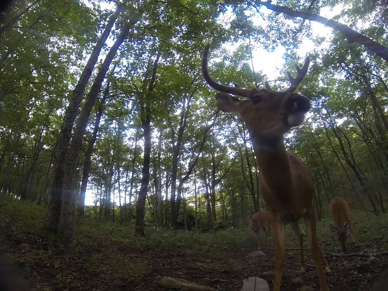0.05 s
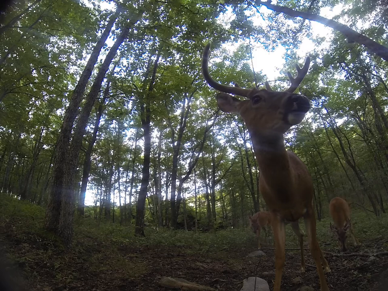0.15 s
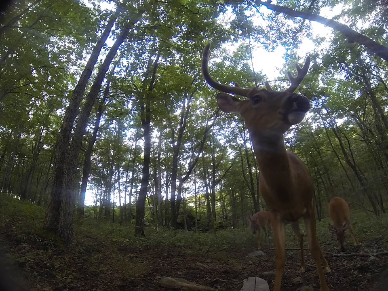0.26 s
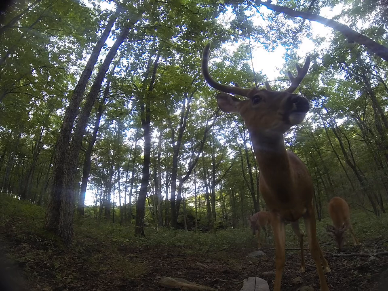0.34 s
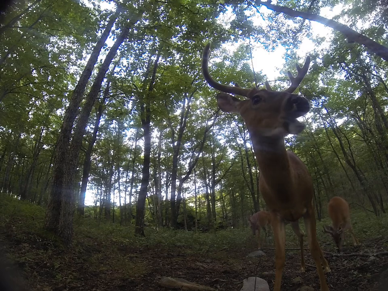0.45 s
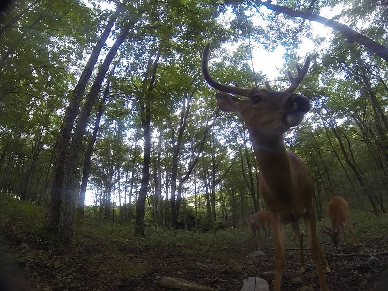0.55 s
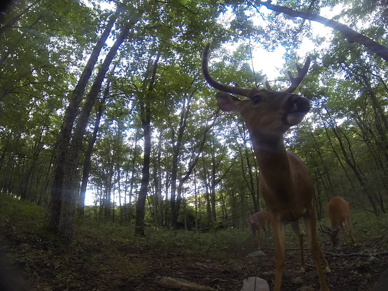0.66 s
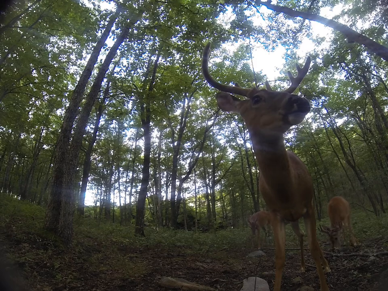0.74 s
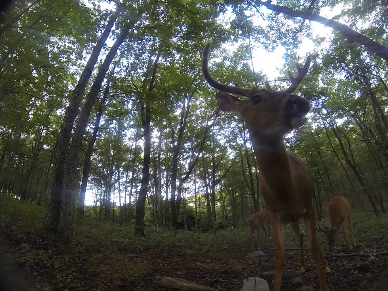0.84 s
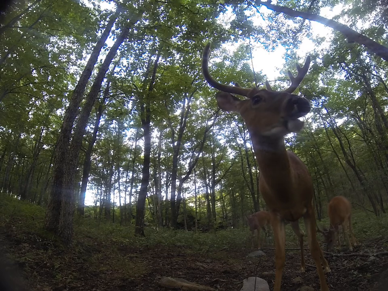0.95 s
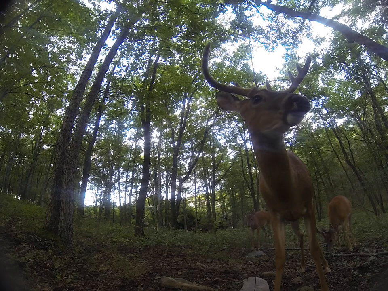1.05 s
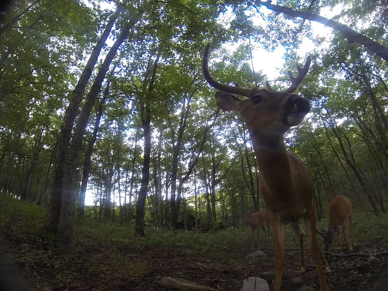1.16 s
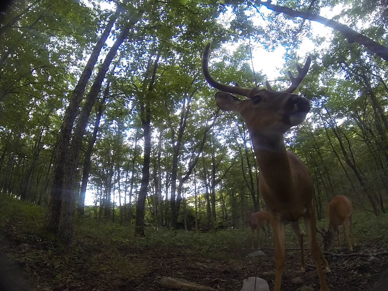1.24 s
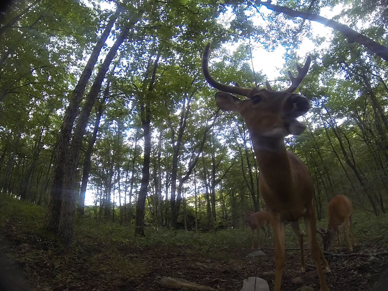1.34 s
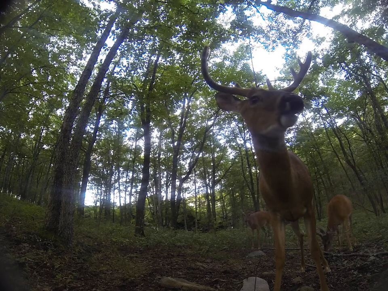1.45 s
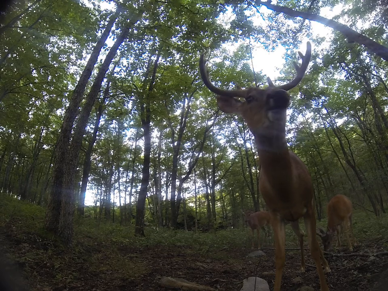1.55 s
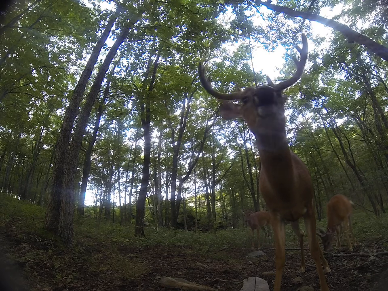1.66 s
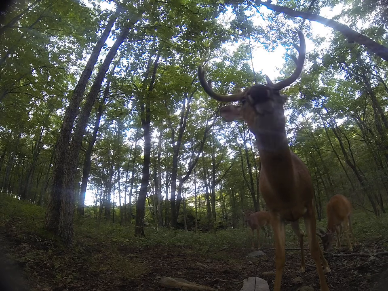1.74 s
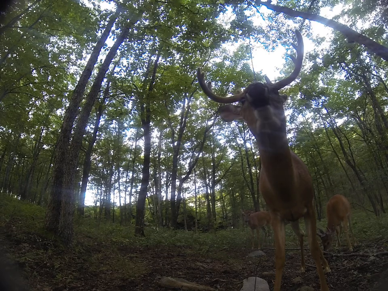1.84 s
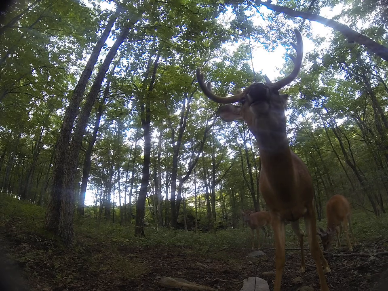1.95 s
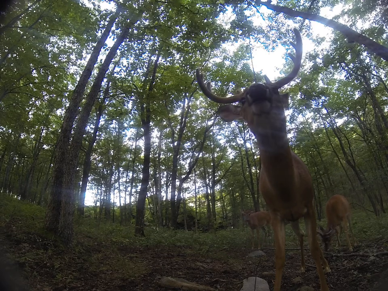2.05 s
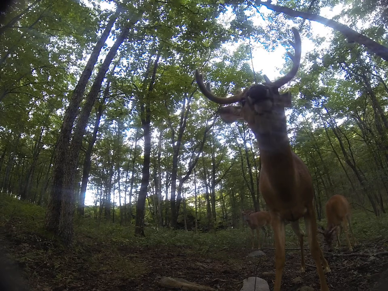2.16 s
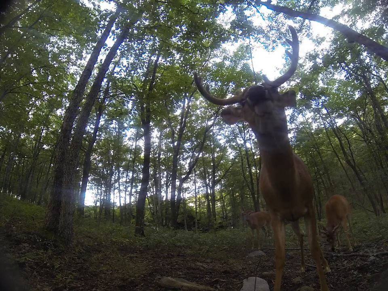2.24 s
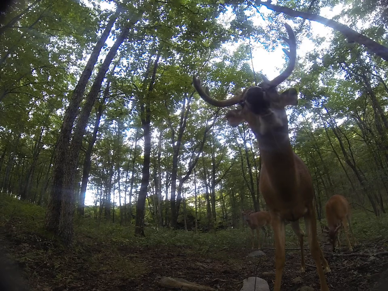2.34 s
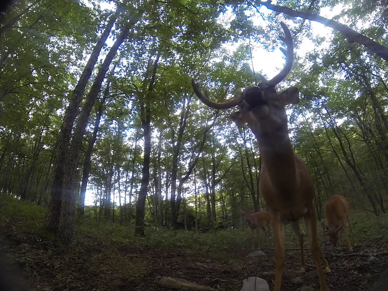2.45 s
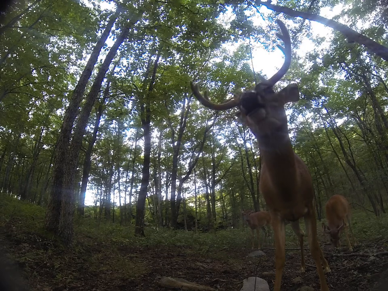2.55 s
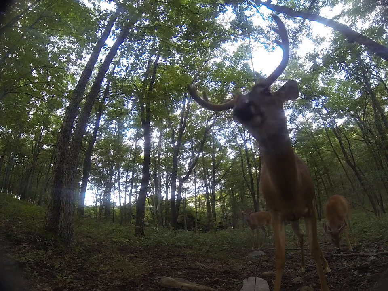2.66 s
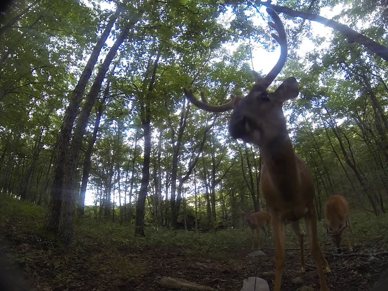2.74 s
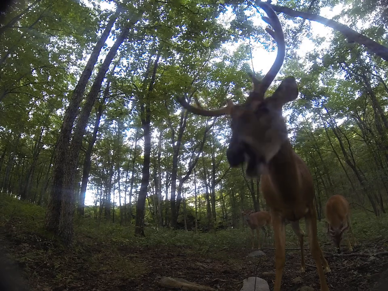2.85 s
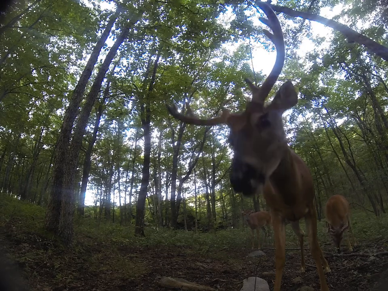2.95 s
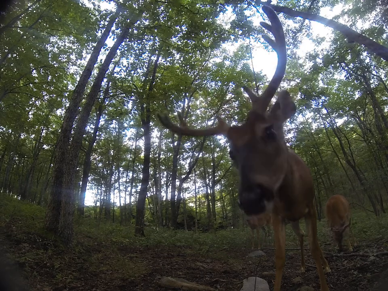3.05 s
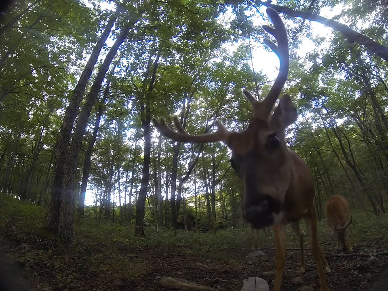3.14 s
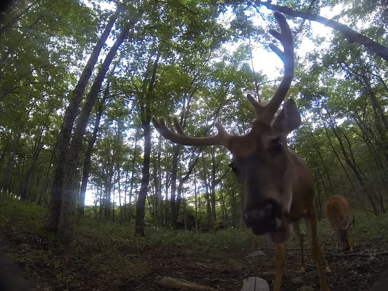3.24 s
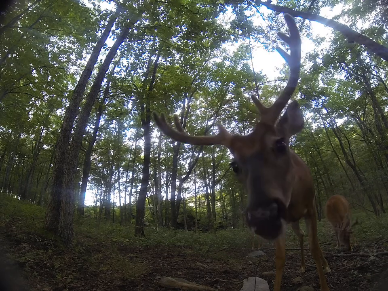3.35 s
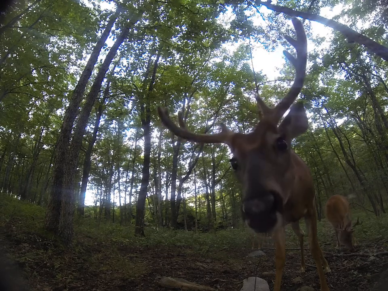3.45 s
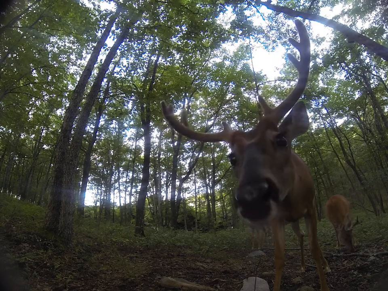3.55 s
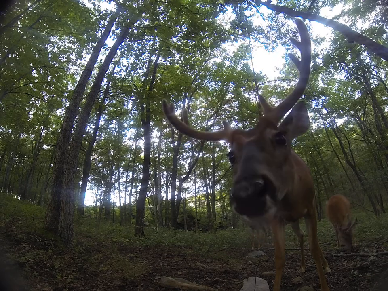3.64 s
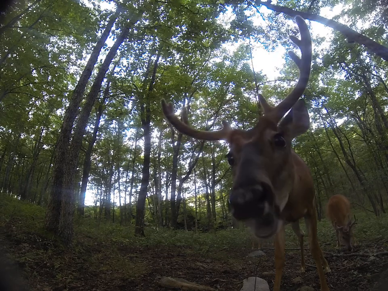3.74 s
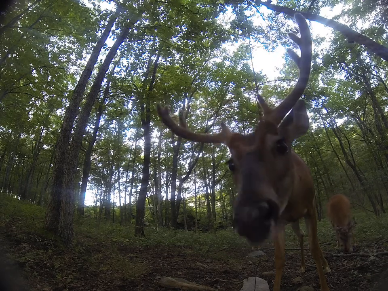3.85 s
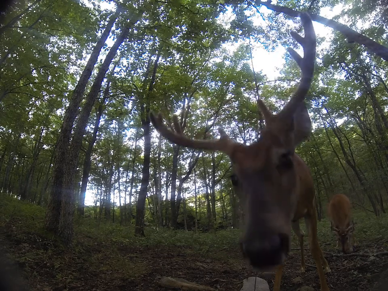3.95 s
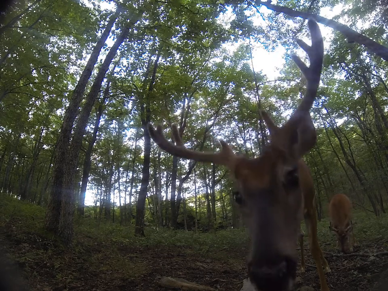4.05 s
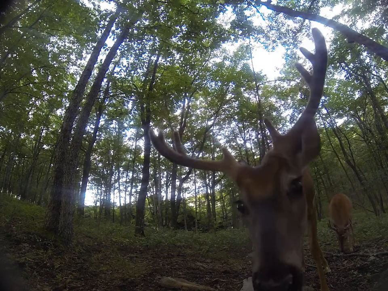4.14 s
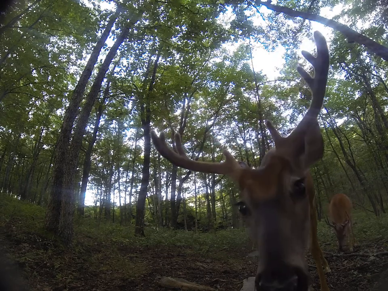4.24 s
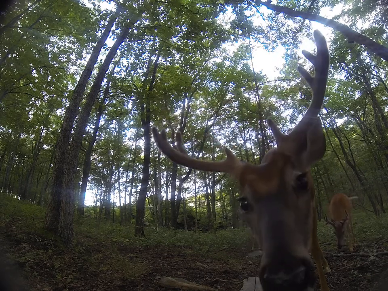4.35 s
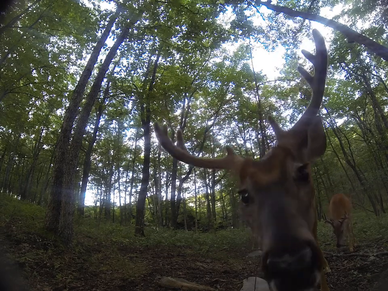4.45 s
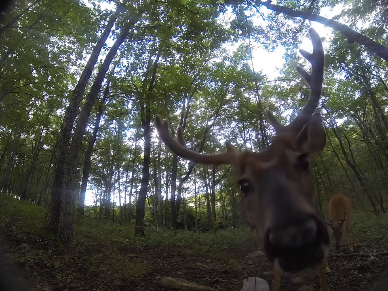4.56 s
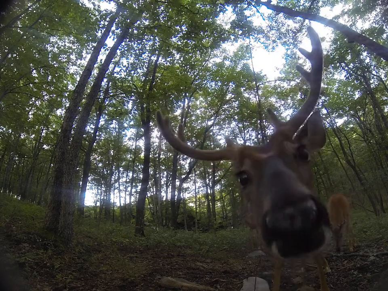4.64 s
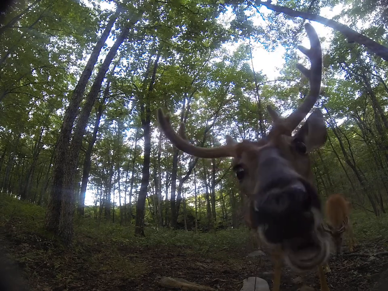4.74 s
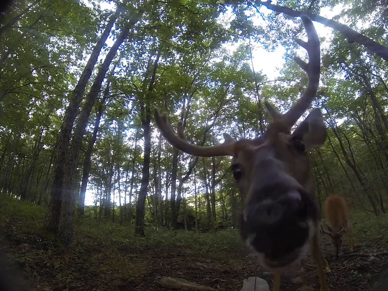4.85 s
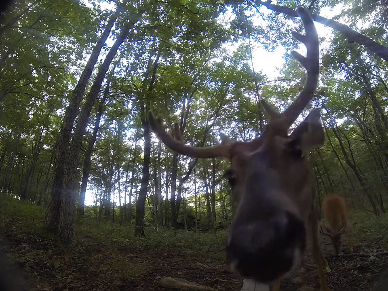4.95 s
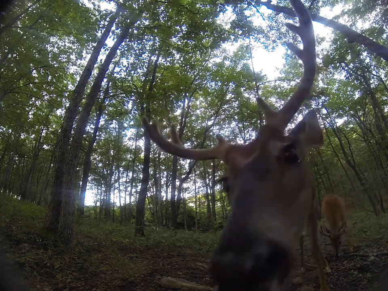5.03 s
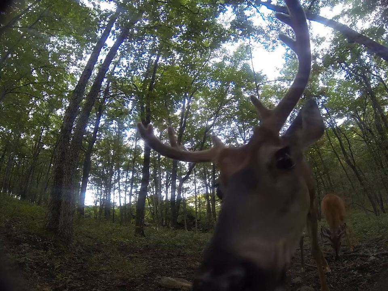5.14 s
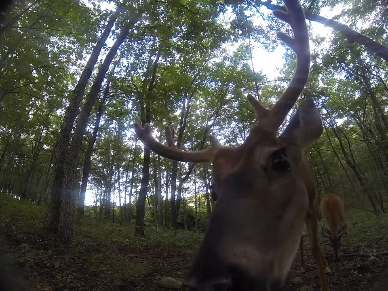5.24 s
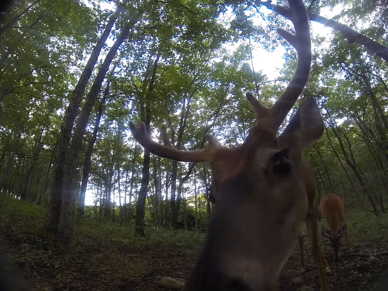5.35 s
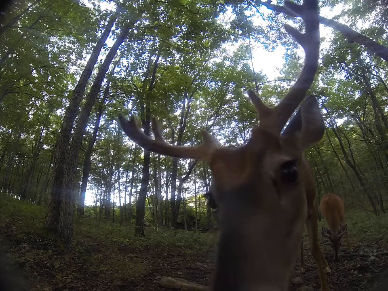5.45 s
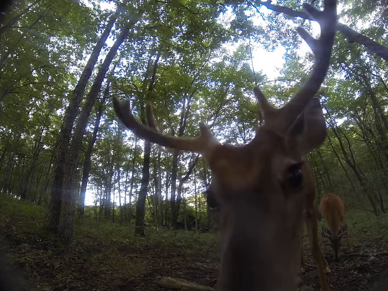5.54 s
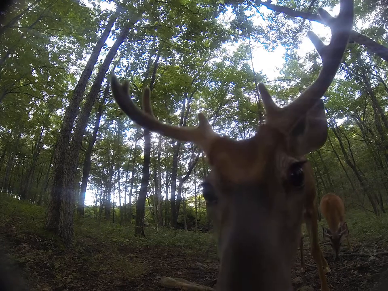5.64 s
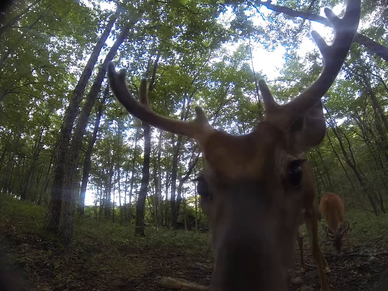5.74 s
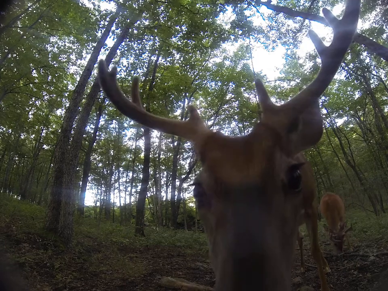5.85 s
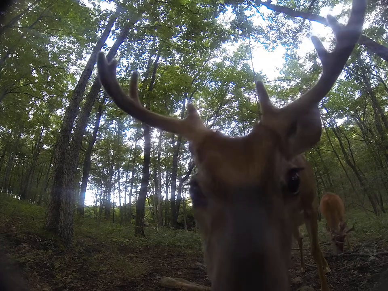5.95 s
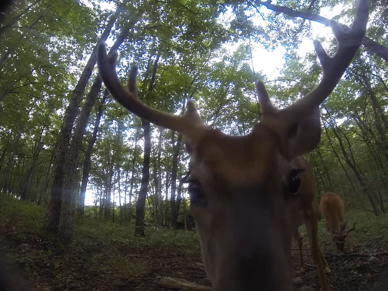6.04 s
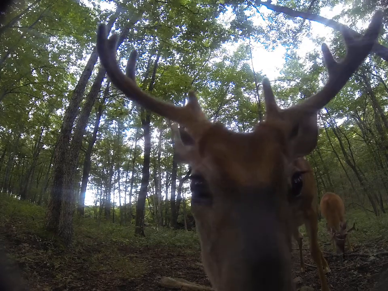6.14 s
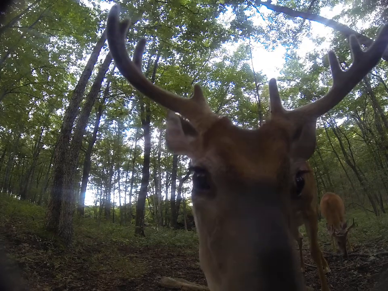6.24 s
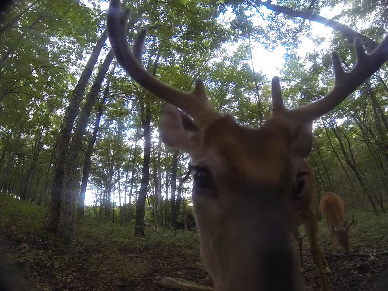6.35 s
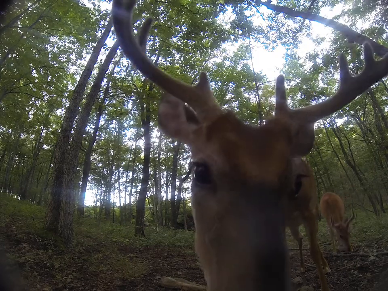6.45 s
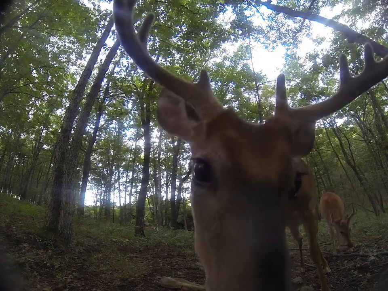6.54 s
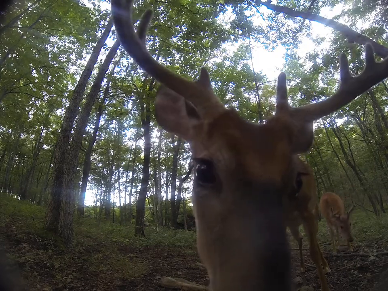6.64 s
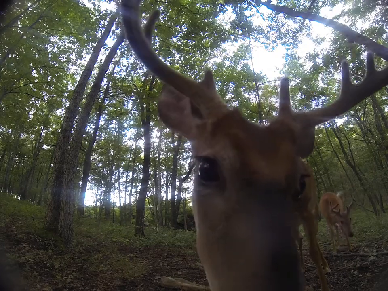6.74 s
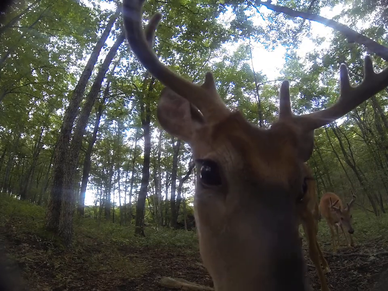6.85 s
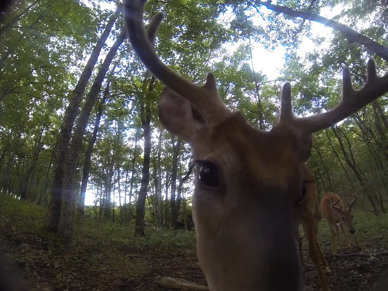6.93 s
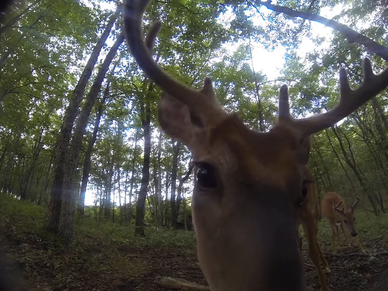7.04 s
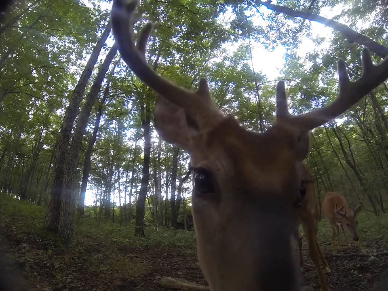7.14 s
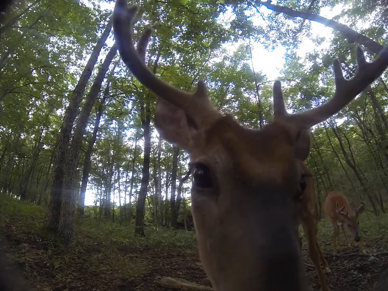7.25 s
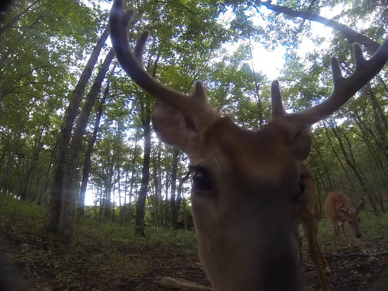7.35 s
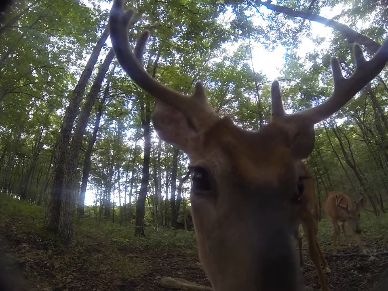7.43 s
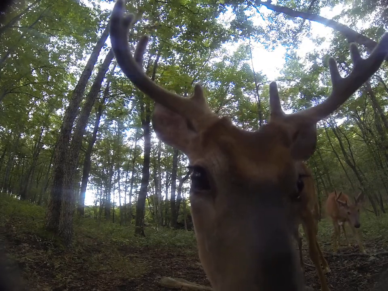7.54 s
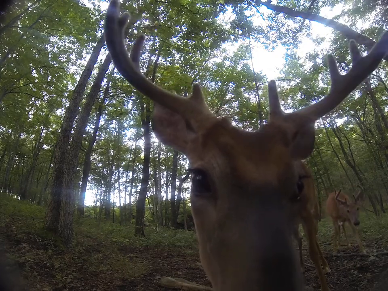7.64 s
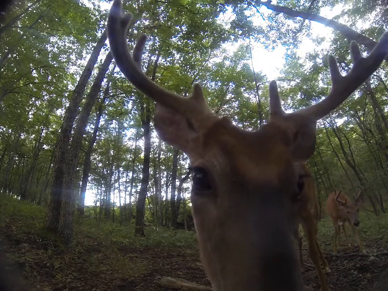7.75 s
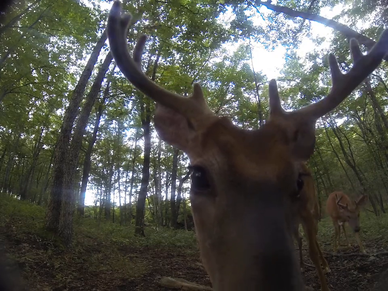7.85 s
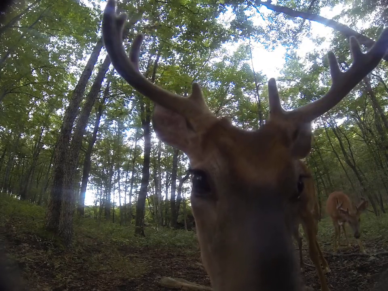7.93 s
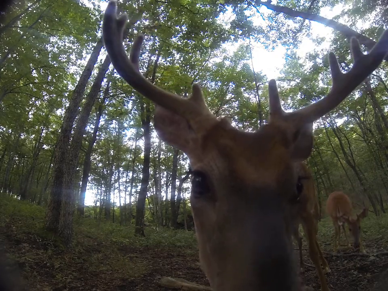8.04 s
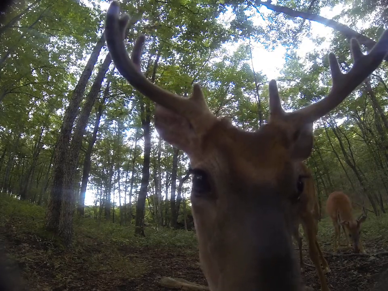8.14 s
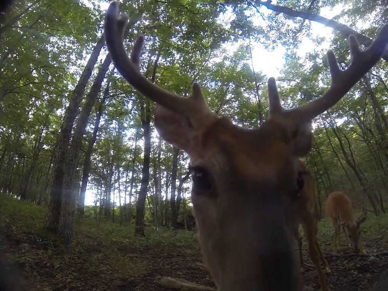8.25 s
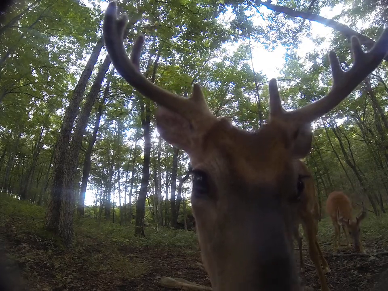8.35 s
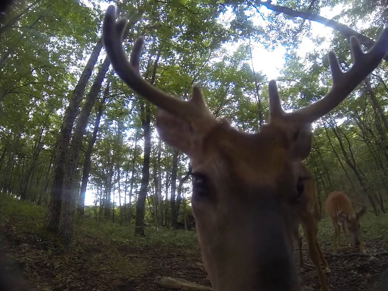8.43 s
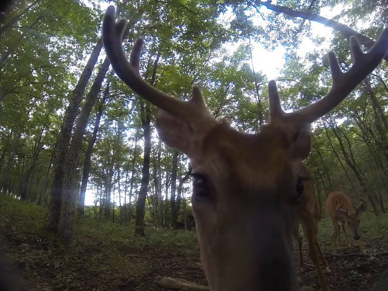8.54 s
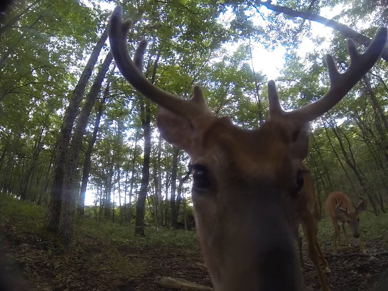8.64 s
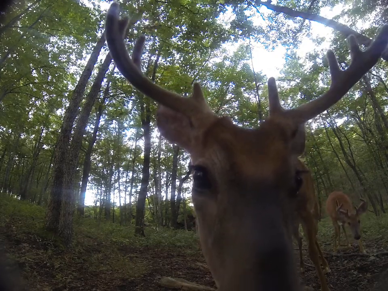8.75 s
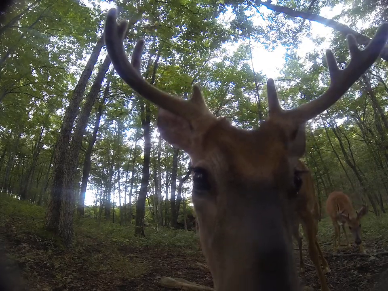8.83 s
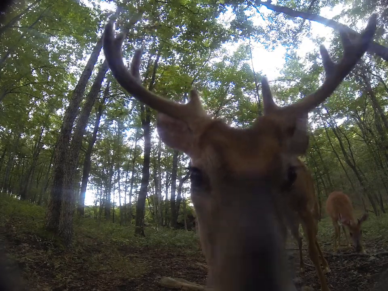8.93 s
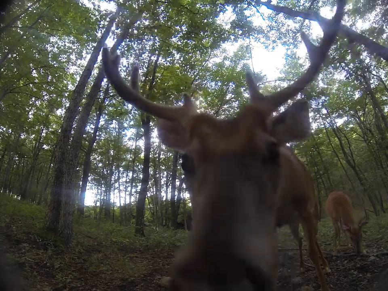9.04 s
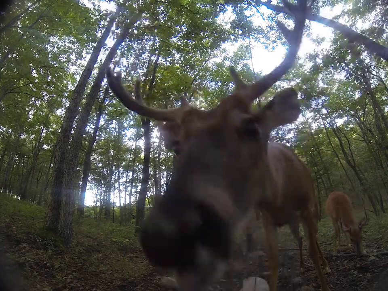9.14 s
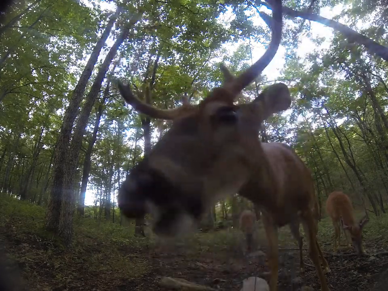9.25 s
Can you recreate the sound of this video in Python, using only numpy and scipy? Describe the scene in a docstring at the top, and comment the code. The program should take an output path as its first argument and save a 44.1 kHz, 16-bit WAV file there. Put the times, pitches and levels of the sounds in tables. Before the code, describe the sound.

Heard from a microphone sealed inside a plastic shell: first mostly quiet hiss and thin electronic whine, with sparse small clicks of a deer's teeth. After more than half the time, abrupt, boxy, rapid scraping and knocking fills everything as the tongue drags and catches on the shell. Soft deep bumps rock the camera, one especially heavy near the end, before near quiet.

```python
"""A deer's tongue sticks and slips on the sealed plastic shell of a small camera on the forest floor.
The shell's own tones ring at each slip, and a scraping drag runs between the slips.
Dull taps stir the hollow inside, while nudges and a steady push rock the camera on the ground.
Before that, faint chewing clicks come through the shell; the camera hisses and whines throughout."""
import sys
import numpy as np
from scipy import signal
from scipy.fft import rfft, irfft, next_fast_len
from scipy.io import wavfile
from scipy.ndimage import uniform_filter1d, map_coordinates

SR = 44100
rng = np.random.default_rng(int(sys.argv[2]) if len(sys.argv) > 2 else 0)


def master(y):
    """Save y as 16-bit WAV."""
    cut = np.clip(np.atleast_2d(y).T, -1, 1)
    pcm = np.round(cut * 32767)  # scale
    wavfile.write(sys.argv[1], SR, pcm.astype(np.int16))


def makeup_ratio(level_db):
    """Linear amplitude ratio for a level in decibels (20 dB per factor of ten)."""
    decades = np.asarray(level_db, float) / 20
    return 10 ** decades


N = 409688
t = np.arange(N) / SR


def unit(x):
    """Scale x to an rms of 1."""
    return x / np.sqrt(np.mean(x ** 2) + 1e-20)


def curves(rows):
    """Draw each column as a line over time; also tell which samples come after the first row."""
    times, *columns = np.transpose(rows)
    return [np.interp(t, times, column) for column in columns], t > times[0]


def filtered(x, response):
    """Shape x by a complex response of frequency."""
    size = next_fast_len(N + SR)
    freqs = np.fft.rfftfreq(size, 1 / SR)
    return irfft(rfft(x, size) * response(freqs), size)[:N]


def modes(rows, order=3):
    """Ringing tones, each passed three times through one resonance: a brief swell and steep sides."""
    def response(f):
        total = 0
        for k, (centre, width, db) in enumerate(rows):
            damping = 1j * f * width
            resonance = damping / (centre ** 2 - f ** 2 + damping)
            total = total + (-1) ** k * makeup_ratio(db) * resonance ** order  # neighbours in opposite phase
        return total
    return response


def struck(force, response):
    """Ring a response with a force, scaled so that a single unit impulse would peak at 1."""
    impulse = 1. * (np.arange(N) == 0)
    return filtered(force, response) / np.abs(filtered(impulse, response)).max()


def bursts(times, db, length):
    """Short ragged forces that fade with a time constant of length seconds; 0 dB is unit energy."""
    k = np.arange(256)
    shape = rng.standard_normal((len(times), 256)) * np.exp(-k / (length * SR))
    shape /= np.linalg.norm(shape, axis=1, keepdims=True)
    force = shape * makeup_ratio(db)[:, None]
    at = np.round(np.asarray(times) * SR).astype(int)[:, None] + k
    return np.bincount(at.ravel(), force.ravel(), N + 256)[:N]


def grit(rate, spread_db):
    """Random micro-slips, about rate per second, many small and few large, at rms 1."""
    chance, side, size = rng.random((3, N))
    size_db = -spread_db * np.log(size + 1e-9).clip(-4)
    return unit((chance < rate / SR) * np.sign(side - .5) * makeup_ratio(size_db))


def skids(times, db, life):
    """Envelope that jumps at each slip and fades with a time constant of life seconds."""
    kicks = np.bincount(np.round(times * SR).astype(int), makeup_ratio(db), N)
    return signal.lfilter([1], [1, -np.exp(-1 / (life * SR))], kicks)


# colour of the microphone circuit's hiss: (f/Hz, relative level/dB per Hz)
HISS = [(20, 3.5), (60, -3), (200, -9), (600, -19), (1500, -25), (4500, -30.5), (7000, -34.5),
        (12000, -38.5), (14600, -32.5), (15000, -42.5), (15100, -71)]
# forest air lifted by the microphone port: (f/Hz, width/Hz, level/dB over the hiss)
AIR = [(1660, 320, 5), (2240, 200, -18.5), (2980, 300, 12), (3800, 350, -12), (5480, 200, 9),
       (8300, 500, 0.5), (9200, 350, -2), (10500, 700, 3.5)]


def hiss():
    """Circuit hiss and forest air together: random noise shaped by one colour curve."""
    hz, db = np.transpose(HISS)

    def colour(f):
        circuit = makeup_ratio(np.interp(np.log(f + 1), np.log(hz), db, left=-60, right=-120))
        air = sum(makeup_ratio(2 * gain) / (1 + (2 * (f - centre) / width) ** 2) for centre, width, gain in AIR)
        return circuit * np.sqrt(1 + air)  # powers add

    return makeup_ratio(-60) * unit(filtered(rng.standard_normal(N), colour))


def clock_tone():
    """A steady thin tone from the circuit's clock: one sine."""
    clock_hz, rms_db = 3000, -82
    return np.sqrt(2) * makeup_ratio(rms_db) * np.sin(2 * np.pi * clock_hz * t)


# whine of the image sensor: (f/Hz, rms level/dB while on)
WHINE = [(6480, -76), (6620, -85), (12350, -93.5), (12880, -74), (13070, -89.5), (13210, -95)]


def frame_whine():
    """Thin tones that switch on and off with each sensor frame."""
    frame_hz, first_start_s, share_on = 48000 / 1001, 1.0095, 0.4
    frames = (t - first_start_s) * frame_hz
    gate = uniform_filter1d(1. * (frames % 1 < share_on), size=45)  # softened edges, about 1 ms
    number = (frames - frames[0] // 1).astype(int)
    out = np.zeros(N)
    for hz, db in WHINE:
        phase = 2 * np.pi * rng.random(number[-1] + 1)[number]  # each frame starts afresh
        out = out + np.sqrt(2) * makeup_ratio(db) * gate * np.sin(2 * np.pi * hz * t + phase)
    return out


# ringing of the sealed microphone port: (f/Hz, width/Hz of each pass, relative level/dB)
PORT = [(1536, 340, 0), (2190, 1000, 2), (3700, 500, -10), (6500, 4000, -20)]
# chewing clicks heard through the air: (t/s, level/dB, upper ring level/dB against it)
CHEWS = [(0.0987, -52, -17), (0.1872, -44.5, 0.5), (0.5794, -51.5, 9), (0.671, -51, 6), (0.9971, -56, -8),
         (1.046, -53, -15), (1.5419, -58, -14), (1.695, -40, 1.5), (2.049, -51.5, 2), (2.0787, -35, -8),
         (2.1321, -46, -15), (2.2752, -61, -7), (2.3136, -56, -15), (2.5691, -58, 0), (2.5955, -60, -4),
         (2.6665, -52.5, 7), (2.7054, -52, -6), (2.9974, -49, -6), (3.4331, -56, -15), (3.4456, -52.5, -16),
         (3.6321, -57, -12), (3.926, -43.5, -15), (3.972, -43, -23), (4.4887, -51, -15), (4.497, -46, -7),
         (4.5256, -42.5, 1), (4.6558, -54, -13), (4.8838, -59, -1), (4.9175, -35, -2), (4.9606, -50, -19),
         (5.0285, -52, -4), (5.0409, -52, 1), (5.3896, -56.5, -1), (5.465, -53, -13), (5.5239, -42, -5),
         (5.5732, -43, -8)]


def chewing():
    """Teeth click at a distance; the port rings in answer, its lowest tone apart from the rest."""
    times, db, upper_db = np.transpose(CHEWS)
    low = struck(bursts(times, db, length=0.00061), modes(PORT[:1]))
    upper = struck(bursts(times, db + upper_db, length=0.00048), modes(PORT[1:]))
    return low + upper


# the camera rocking on its base: (f/Hz, share of a nudge's ring time)
ROCKING = [(84, 1), (108, 0.76)]
# nudges, damped more or less by the muzzle:
# (t/s, level/dB before the swell, upper tone level/dB against it, time to fall 60 dB/s)
NUDGES = [(4.484, -52, -9, 0.36), (4.714, -49, 0, 0.3), (5.691, -20, -1.5, 0.21), (5.903, -11, -20, 0.13),
          (5.998, -17, -11, 0.29), (6.173, -27, 2.5, 0.25), (6.378, -38, 27, 0.13),
          (6.636, -26.5, -22, 0.26), (6.711, -17.5, 2, 0.18), (6.843, -35.5, -8, 0.26),
          (6.954, -21.5, -8, 0.18), (7.208, -10.5, -5, 0.22), (7.467, -24, 10, 0.17),
          (7.723, -21, -4.5, 0.25), (7.791, -13, -8.5, 0.19), (7.948, -29.5, -8.5, 0.18),
          (8.083, -40.5, -3.5, 0.3), (8.16, -14.5, -26.5, 0.18), (8.31, -22, -13.5, 0.33),
          (8.582, 2.5, -3, 0.21), (8.679, -18, -1.5, 0.37), (8.734, -18.5, -2.5, 0.23),
          (9.012, -53.5, -4.5, 0.37), (9.114, -50.5, 3, 0.3)]


def nudges():
    """Each soft nudge rings the two rocking tones, which swell, glide down in pitch and die away."""
    out = np.zeros(N)
    for start, db, upper_db, t60 in NUDGES:
        since = np.clip(t - start - .003, 0, None)  # the ring begins 3 ms after the listed time
        swell = (1 - np.exp(-since / .006)) ** 2  # flesh is a slow hammer
        # pressed hard, the base is stiffer: the pitch starts high
        bent_time = since + 0.0033 * (1 - np.exp(-since / .012))
        for (hz, life), level_db in zip(ROCKING, (db, db + upper_db)):
            fading = makeup_ratio(level_db - 60 * since / (life * t60))
            out = out + swell * fading * np.sin(2 * np.pi * hz * bent_time)
    return out


# steady push of the muzzle: (t/s, rocking level/dB, slow sway rms level/dB)
PUSH = [(5.55, -81, -87), (5.71, -52, -40.5), (5.9, -36.5, -44), (6.61, -39.5, -46.5), (7.2, -39.5, -31),
        (8.0, -39, -47), (8.28, -35, -29.5), (8.51, -57.5, -54), (8.64, -44, -26), (9.06, -60.5, -55.5),
        (9.29, -60, -65)]


def steady_push():
    """An uneven push, made of noise, keeps the rocking tones stirring and sways the base slowly."""
    (push_db, sway_db), on = curves(PUSH)
    out = on * makeup_ratio(sway_db) * unit(filtered(rng.standard_normal(N), modes([(26, 24, 0)])))
    for hz, _ in ROCKING:
        stirred = unit(filtered(rng.standard_normal(N), modes([(hz, 45, 0)])))
        out = out + on * makeup_ratio(push_db - 1.5) * stirred
    return out


# ringing tones of the plastic shell: (f/Hz, width/Hz of each pass, relative level/dB)
SHELL = [(1322, 278, 0), (1558, 690, -18.5), (2327, 755, -2), (2898, 830, -8), (3317, 703, -4.5),
         (4885, 1510, -20), (5224, 920, -27.5), (6626, 1190, -31), (8230, 780, -42.5), (9200, 600, -46),
         (10200, 800, -62.5), (11800, 1200, -72.5)]
# stick-slips on the shell: (t/s, door ring level/dB, wall ring level/dB, edge snap level/dB)
SLIPS = [(5.703, -18, -22, -26), (5.7195, -33, -20.5, -51), (5.7547, -27, -52, -44.5),
         (5.803, -31, -31, -46), (5.8925, -17, -17, -22), (5.922, -39, -33, -43.5), (5.9345, -2.5, 0, -8.5),
         (5.9723, -9, -10.5, -26.5), (5.987, -22.5, -37, -42), (6.0448, -22.5, -32.5, -54),
         (6.0646, -31, -26.5, -30), (6.0835, -23, -41, -36.5), (6.0977, -4.5, -5, -16),
         (6.1151, -17.5, -32, -40), (6.1211, -9.5, -6, -29), (6.1255, -8.5, -17, -9.5),
         (6.1629, -14.5, -22, -20.5), (6.1715, -24, -12, -30), (6.2039, -16.5, -17.5, -21),
         (6.231, -54, -27, -54), (6.2382, -26, -22, -30), (6.2564, -18.5, -21, -29), (6.279, -4, -5, -22),
         (6.3067, -32.5, -15.5, -52.5), (6.3234, -16, -20, -24), (6.3373, -15.5, -9, -34),
         (6.3466, -13, -11.5, -8), (6.3564, -16, -12, -23.5), (6.363, -9, -14, -23.5),
         (6.3713, -33, -25, -41), (6.3836, -39.5, -33, -26.5), (6.3967, -34, -24, -31.5),
         (6.41, -13, -18, -27.5), (6.4294, -6.5, -1.5, -30), (6.4409, -8, -7, -15),
         (6.456, -17.5, -28.5, -33.5), (6.465, -26.5, -15, -33.5), (6.496, -23.5, -27, -51.5),
         (6.5232, -24.5, -23, -55), (6.534, -21.5, -19.5, -40.5), (6.548, -31, -31, -42.5),
         (6.5564, -15.5, -12.5, -21), (6.567, -35, -26, -32), (6.5788, -37, -29, -54),
         (6.5871, -7, -3, -13.5), (6.5954, -20, -12, -47), (6.6317, -30.5, -30.5, -51),
         (6.6392, -15, -26, -14), (6.6486, -12.5, -11, -26.5), (6.664, -20.5, -11, -47),
         (6.695, -12, -7, -19), (6.7046, -13, -21.5, -34), (6.7112, -15.5, -21, -38.5),
         (6.7271, -19, -20.5, -25), (6.8137, -34, -34.5, -37), (6.8305, -10, -14, -40),
         (6.8716, 4, -3, -11.5), (6.914, -31.5, -49.5, -53), (6.9273, -52, -36, -31),
         (6.9445, -13, -10, -39), (6.9825, -20.5, -27.5, -49), (7.0402, -20, -18, -34),
         (7.065, -11.5, -14.5, -12), (7.0759, -18, -27, -20), (7.0932, -38, -35, -44),
         (7.1013, -29.5, -21.5, -20), (7.1073, -19.5, -11, -16.5), (7.1225, -9.5, -26.5, -21),
         (7.142, -20.5, -17, -25.5), (7.161, -20, -25, -18.5), (7.19, -32.5, -30, -34),
         (7.2006, -22, -17.5, -20.5), (7.2098, -10, -5.5, -12.5), (7.271, -27, -14.5, -23.5),
         (7.3331, -19, -14, -26.5), (7.36, -3, -6, -22), (7.37, -13, -13, -16.5), (7.3912, -16, -3, -12.5),
         (7.3985, -4.5, -15, -16), (7.415, -25, -21, -35.5), (7.4267, -31, -31, -27),
         (7.4368, -29, -24, -34), (7.4558, -18, -14, -17.5), (7.4754, -21, -19.5, -25),
         (7.543, -27.5, -31, -48), (7.5615, -22.5, -18, -35), (7.568, -15.5, -24.5, -19.5),
         (7.5942, -20.5, -34, -40), (7.6098, -27, -24.5, -31.5), (7.6284, -21.5, -17, -20.5),
         (7.6508, -19, -23, -27), (7.6656, -14.5, -13.5, -24.5), (7.6856, -26, -12, -27),
         (7.6918, -23, -22, -44), (7.7276, -15.5, -22.5, -26.5), (7.7735, -37, -34, -34),
         (7.793, -40.5, -26, -31), (7.8007, -26.5, -35, -43), (7.819, -20.5, -23.5, -27.5),
         (7.8276, -13, -24, -27), (7.8475, -9, -9, -33), (7.8676, -10.5, -20.5, -22),
         (7.8881, -13.5, -8.5, -15), (7.918, -26, -22, -34.5), (7.9453, -22.5, -25.5, -37),
         (7.965, -34.5, -46, -49), (7.9754, -2, -3.5, -14.5), (8.0937, -9.5, -11, -32),
         (8.1252, -26, -29, -28.5), (8.17, -31, -31, -36), (8.197, -25, -24.5, -42),
         (8.214, -34, -38.5, -47.5), (8.2339, -7, -13.5, -43), (8.2405, -17.5, -15, -26),
         (8.2642, -5.5, -2, -20), (8.2714, -18, -12.5, -18), (8.3126, -12, -21.5, -41),
         (8.3419, -24.5, -28, -32), (8.4048, -21, -29, -41), (8.4845, -44, -30, -52),
         (8.553, -49, -40, -60), (8.576, -39, -46, -58), (8.6804, -7, -3, -9.5), (8.7211, -18, -22, -38),
         (8.778, -29.5, -30, -43), (8.8036, -31.5, -31, -43), (8.826, -38, -53, -48),
         (8.8812, -35.5, -44, -63), (8.947, -44.5, -44, -60), (9.016, -48, -61, -66),
         (9.131, -46.5, -53, -63), (9.194, -51, -45.5, -65), (9.205, -46.5, -59, -63)]
# the tongue's drag: (t/s, scrape level/dB, wall and edge brightness level/dB, low body level/dB)
DRAG = [(5.56, -67, 0, -68), (5.656, -60.5, -2.5, -77), (5.712, -33, -6, -41), (5.781, -43.5, -12, -47.5),
        (5.939, -40.5, -8, -43), (6.035, -52, -13, -50), (6.113, -32.5, -12, -38), (6.149, -56.5, -18, -46),
        (6.175, -40, -6.5, -34.5), (6.232, -49, -12, -51), (6.348, -19.5, -10.5, -37),
        (6.388, -36.5, -4, -47), (6.436, -23, -10, -33.5), (6.492, -50.5, -2, -51.5),
        (6.586, -41, -6, -43.5), (6.62, -71, -7.5, -45.5), (6.655, -31, -4, -39), (6.685, -40, -4, -41.5),
        (6.721, -36, -8, -33), (6.771, -50.5, -2, -55), (6.967, -34.5, -9.5, -43), (7.029, -47, -9, -51.5),
        (7.12, -35.5, -10, -41.5), (7.258, -39, -11, -45), (7.38, -24, -10.5, -35.5),
        (7.516, -41.5, -7, -48), (7.731, -30.5, -7, -35.5), (7.767, -39.5, -11, -43.5),
        (7.879, -28, -14, -38.5), (8.002, -52, -10, -51), (8.094, -33, -9, -49), (8.146, -44.5, -8, -55),
        (8.256, -30.5, -12.5, -38.5), (8.457, -67.5, -1, -66), (8.571, -43, -6, -54.5),
        (8.687, -47.5, -11.5, -49), (8.972, -72, 0, -59), (9.29, -66, -1, -61)]


def shell():
    """Slips, skids and fine grit drive three zones of the shell, each with its share of the tones."""
    door_top_hz, wall_top_hz = 1900, 4000
    door = modes([m for m in SHELL if m[0] < door_top_hz])
    wall = modes([m for m in SHELL if door_top_hz <= m[0] < wall_top_hz])
    edge = modes([m for m in SHELL if m[0] >= wall_top_hz])
    times, door_db, wall_db, edge_db = np.transpose(SLIPS)
    (scrape_db, bright_db, _), on = curves(DRAG)
    # the grit comes in random clumps, a fresh strength every 300 samples
    clumps = map_coordinates(rng.standard_normal(N // 300 + 4), [np.arange(N) / 300])
    fine = makeup_ratio(4.5 * clumps) * grit(rate=4000, spread_db=4)
    out = np.zeros(N)
    # zone, slip level/dB, drag level/dB, slip length/s, skid level/dB against the slip, skid life/s
    for zone, slip_db, drag_db, length, skid_db, life in (
            (door, door_db, scrape_db, .0006, -17, .012),
            (wall, wall_db, scrape_db + bright_db, .001, -16, .008),
            (edge, edge_db, scrape_db + bright_db - 14.5, .001, -18, .007)):
        # after a slip the tongue skids on
        pressure = on * makeup_ratio(drag_db) + skids(times, slip_db + skid_db, life)
        scrape_rms = filtered(fine, zone).std()
        out = out + struck(bursts(times, slip_db, length), zone)
        out = out + filtered(pressure * fine, zone) / scrape_rms
    return out


# low tones of the hollow inside: (f/Hz, width/Hz of each pass, relative level/dB)
CAVITY = [(194, 130, -12), (314.7, 115.5, -0.5), (473, 253, -9.5), (751, 380, -14)]
# dull taps: (t/s, level/dB)
TAPS = [(5.702, -23), (5.89, -31), (5.934, -20), (5.971, -28), (6.097, -23), (6.17, -26.5), (6.277, -30.5),
        (6.313, -30), (6.435, -35.5), (6.586, -23), (6.636, -32), (6.708, -24), (6.829, -26),
        (6.871, -27.5), (6.974, -30), (7.064, -30), (7.159, -27), (7.214, -24), (7.299, -38), (7.369, -19),
        (7.464, -25.5), (7.65, -24), (7.727, -22.5), (7.843, -30.5), (7.974, -24), (8.03, -30),
        (8.156, -44), (8.233, -27.5), (8.263, -25), (8.33, -26), (8.388, -34), (8.584, -33.5), (8.68, -23),
        (8.72, -32.5), (8.778, -36.5), (8.824, -44), (8.876, -35), (9.014, -40), (9.126, -38.5),
        (9.192, -40.5)]


def cavity():
    """The drag's coarse grit and separate dull taps stir the low tones of the hollow."""
    (_, _, body_db), on = curves(DRAG)
    body = on * makeup_ratio(body_db) * unit(filtered(grit(rate=2000, spread_db=2.5), modes(CAVITY)))
    times, db = np.transpose(TAPS)
    return body + struck(bursts(times, db, length=.0015), modes(CAVITY))


def scene():
    """Everything reaches the one microphone inside the shell."""
    deer = shell() + cavity() + steady_push() + nudges() + chewing()
    camera = hiss() + clock_tone() + frame_whine()
    return (deer + camera)[None]


def top_cut(x):
    """Nothing passes above the cut-off."""
    return signal.sosfilt(signal.butter(12, 15800, fs=SR, output="sos"), x)


def record(dry):
    """The microphone rolls off at the top; the input saturates near full scale."""
    top_hz = 14500
    heard = filtered(dry[0], lambda f: 1 / np.sqrt(1 + (f / top_hz) ** 24))[None]
    mix = heard / (1 + np.abs(heard) ** 16) ** (1 / 16)
    return top_cut(mix)


dry = scene()
out = record(dry)
master(out)
```